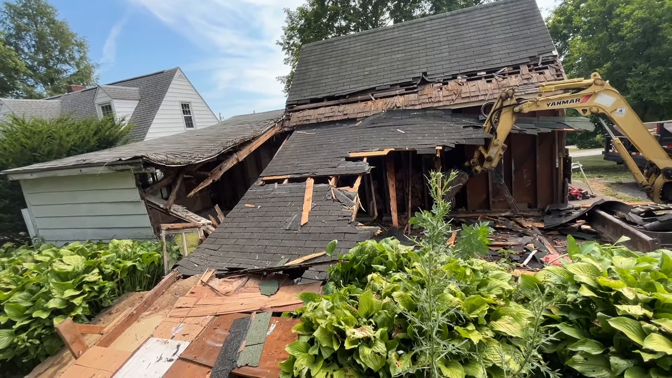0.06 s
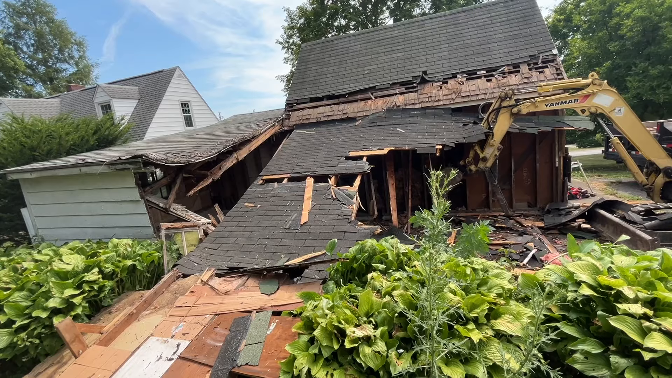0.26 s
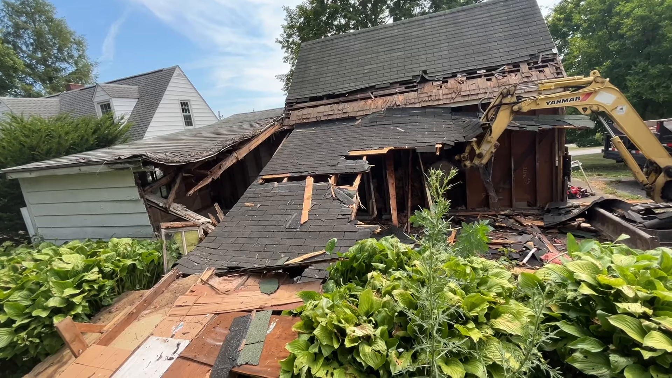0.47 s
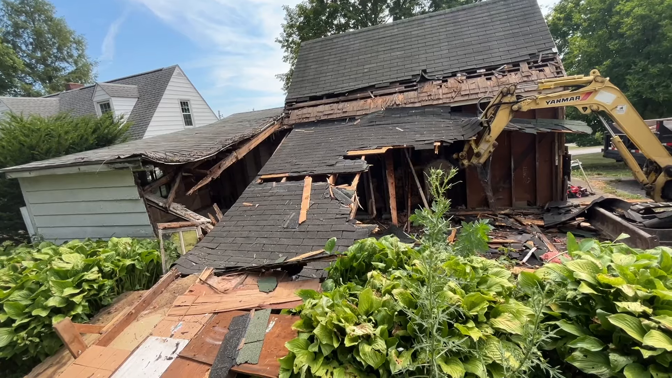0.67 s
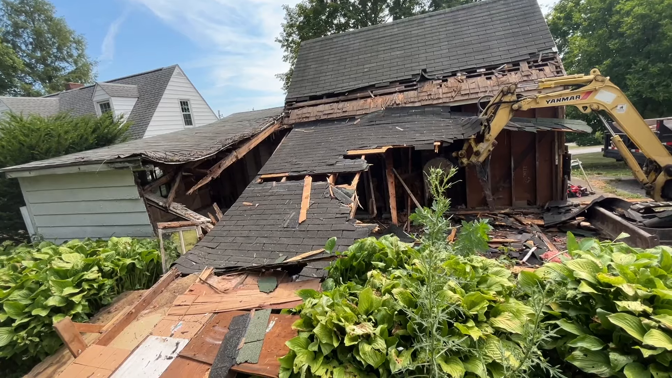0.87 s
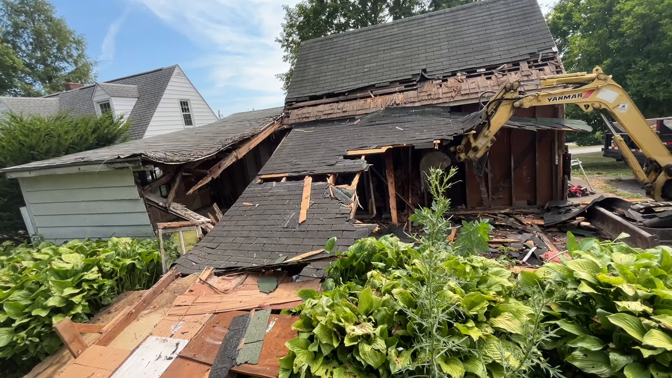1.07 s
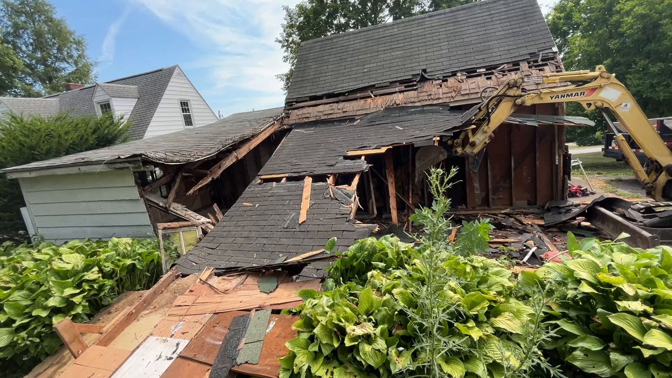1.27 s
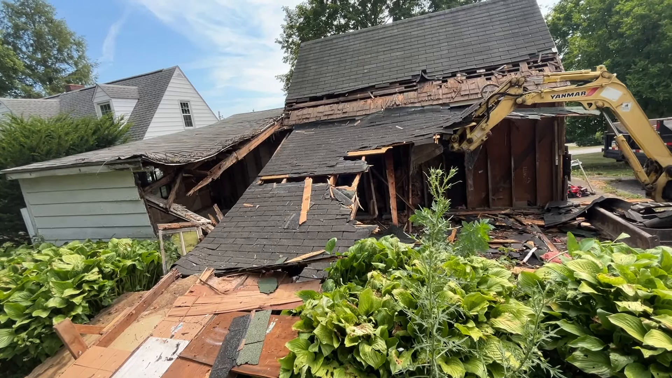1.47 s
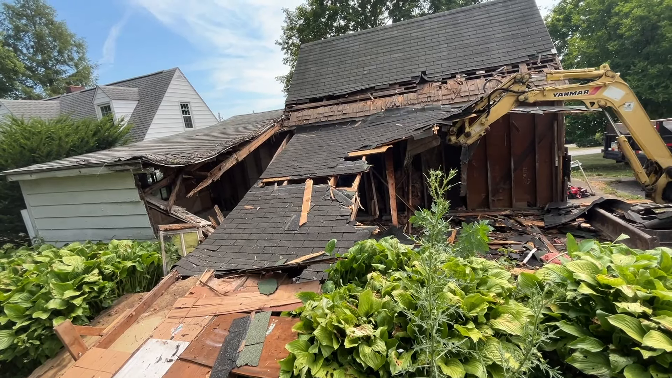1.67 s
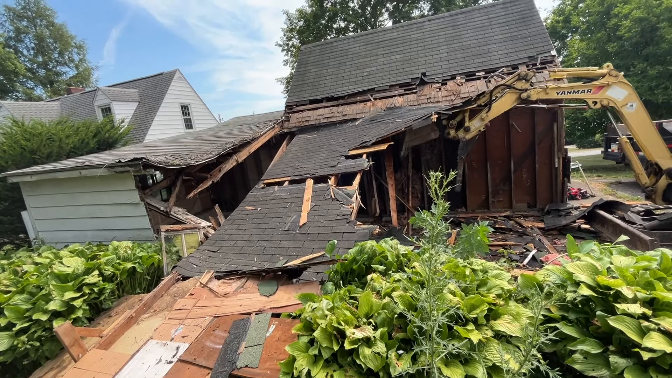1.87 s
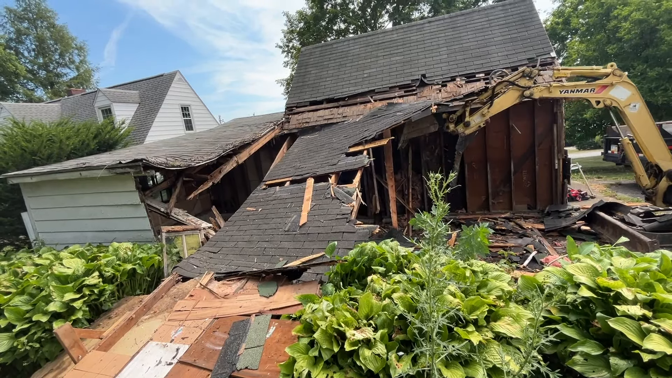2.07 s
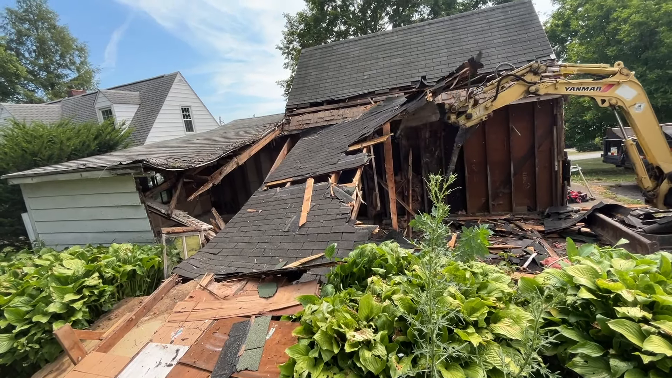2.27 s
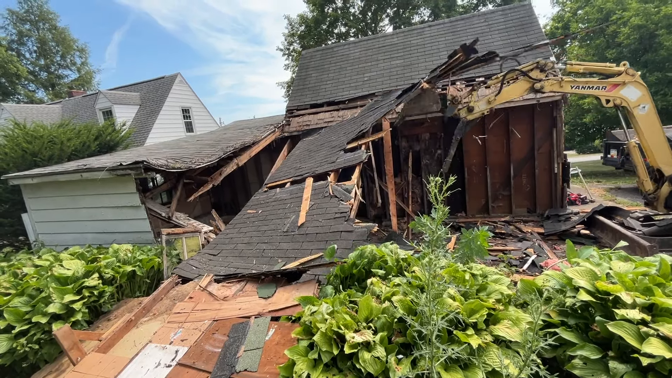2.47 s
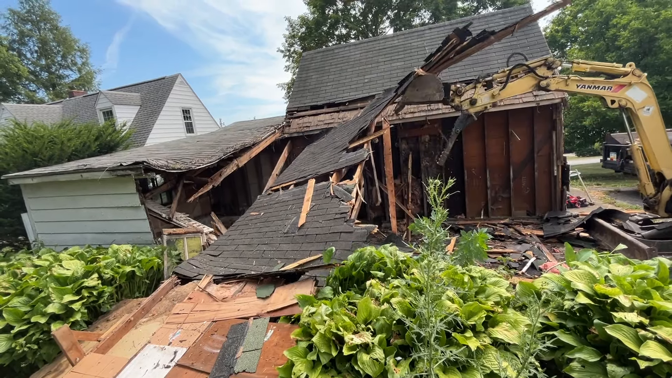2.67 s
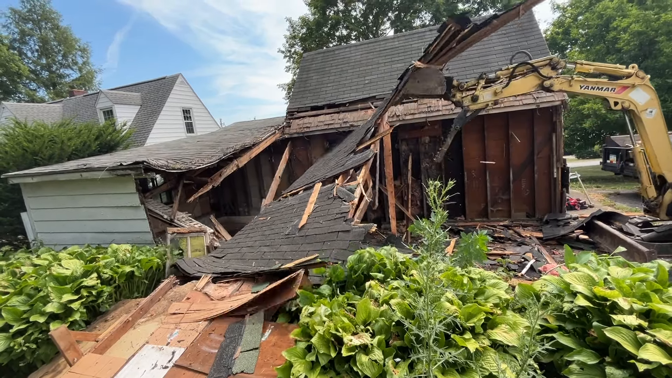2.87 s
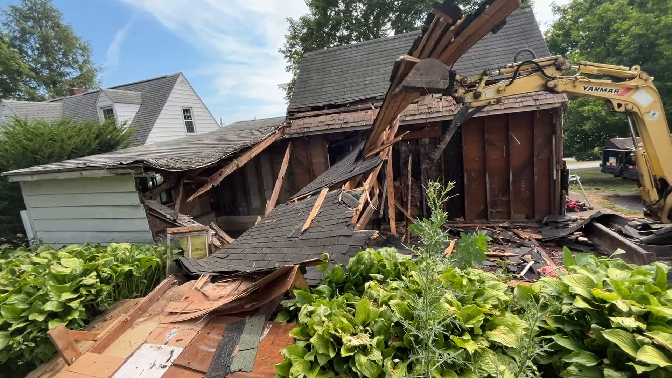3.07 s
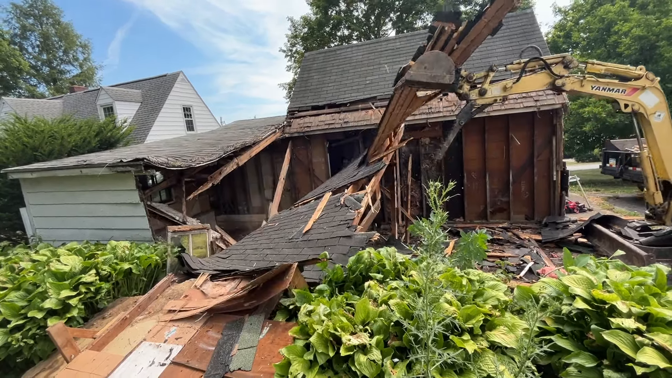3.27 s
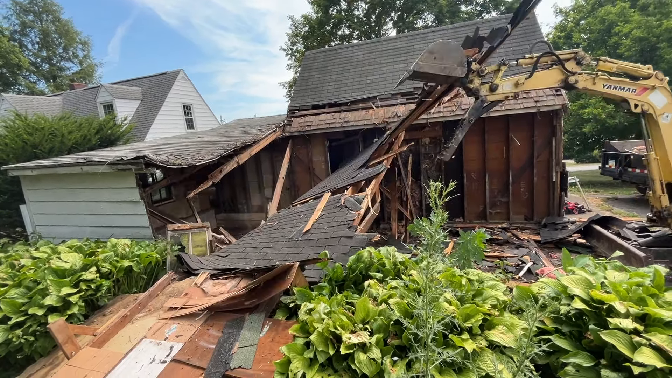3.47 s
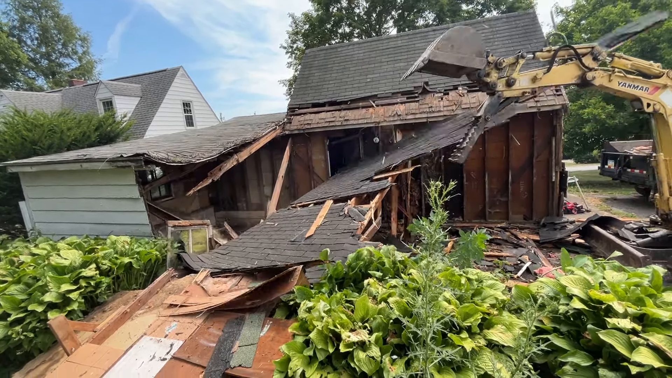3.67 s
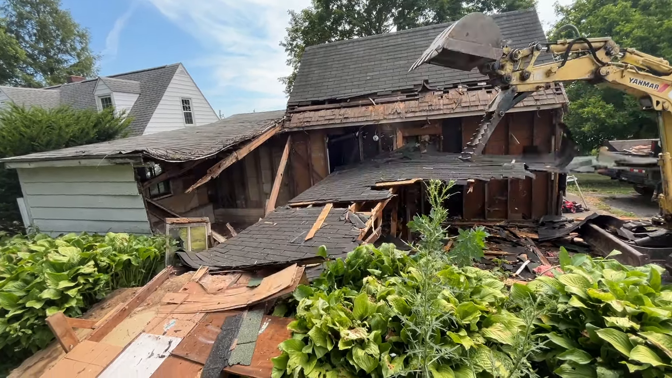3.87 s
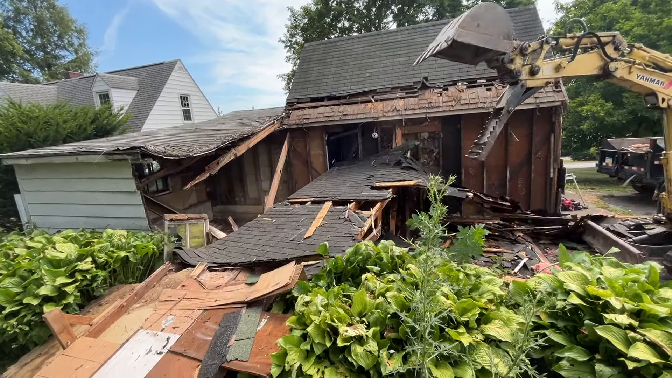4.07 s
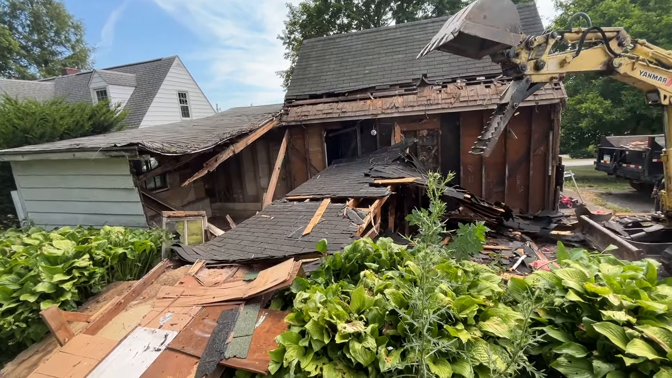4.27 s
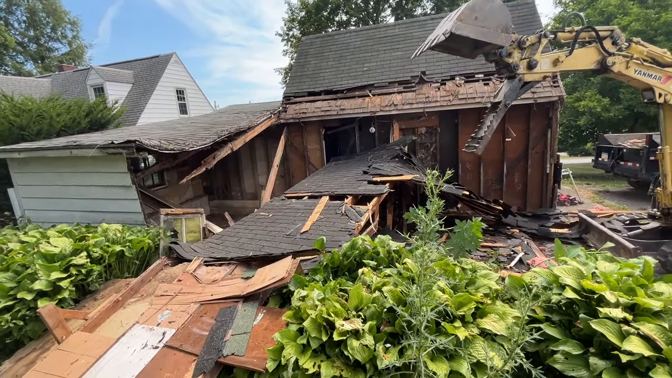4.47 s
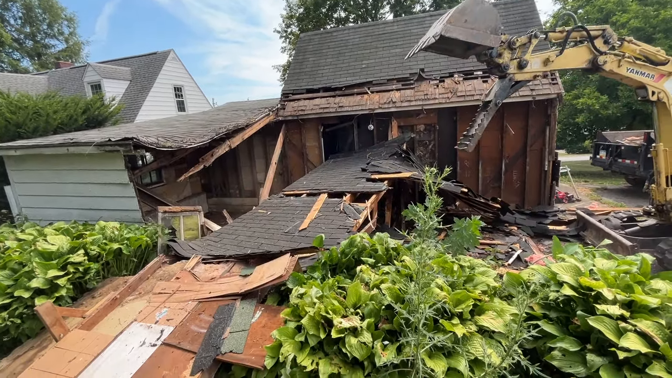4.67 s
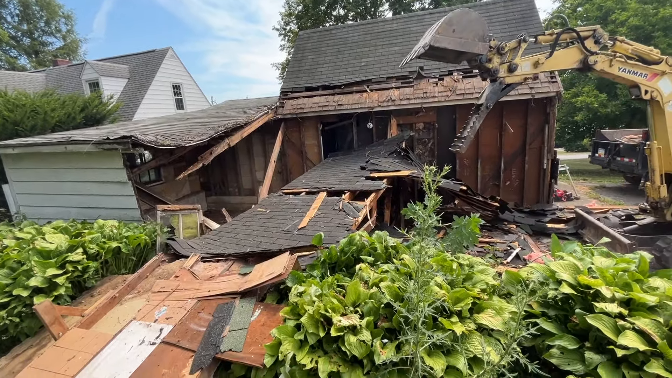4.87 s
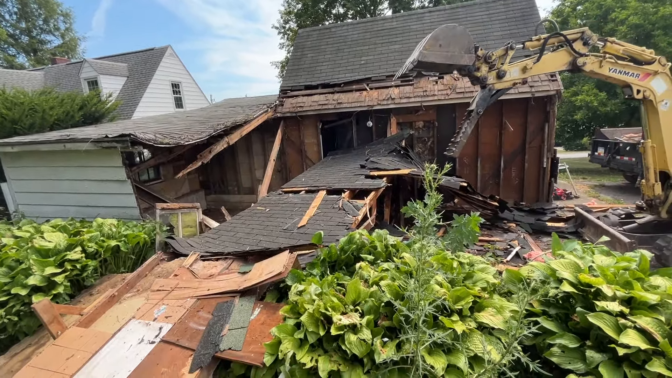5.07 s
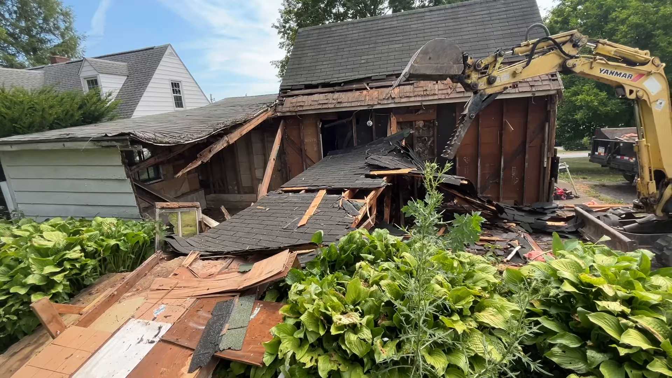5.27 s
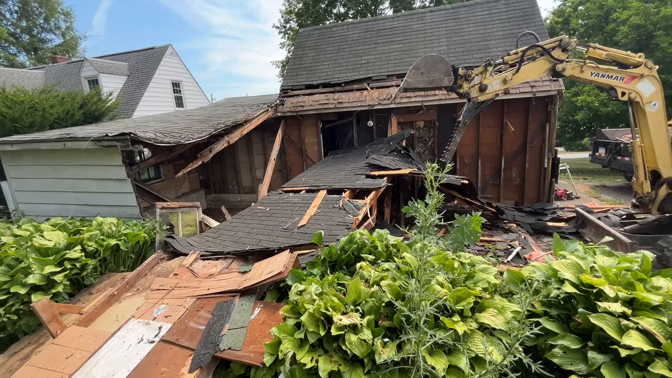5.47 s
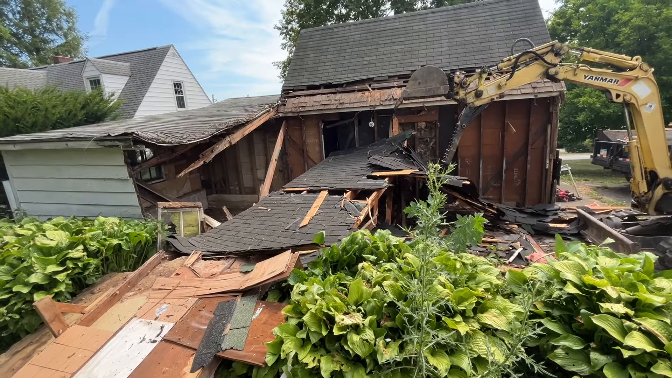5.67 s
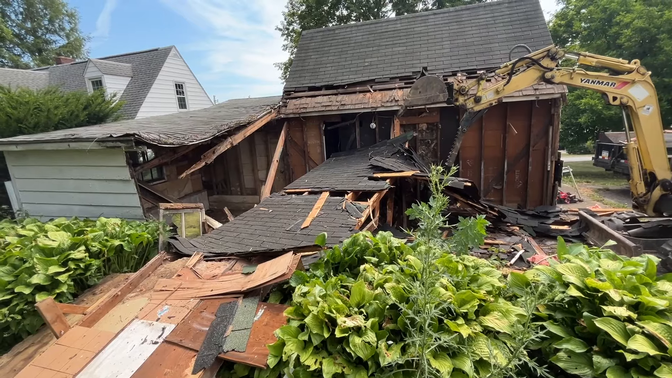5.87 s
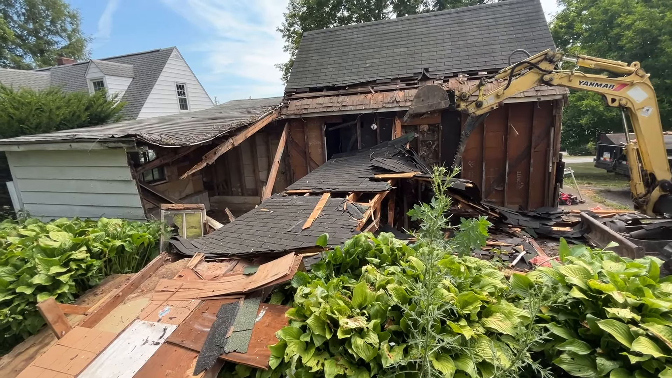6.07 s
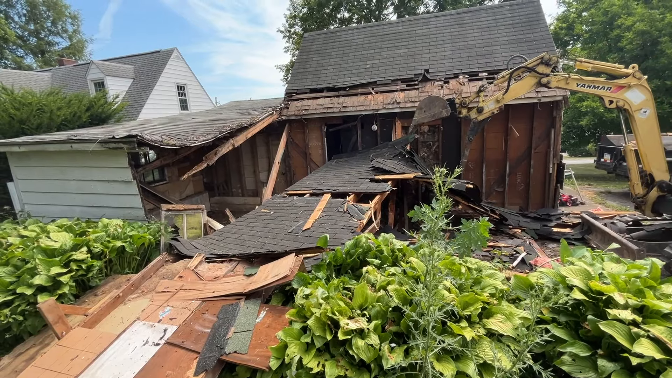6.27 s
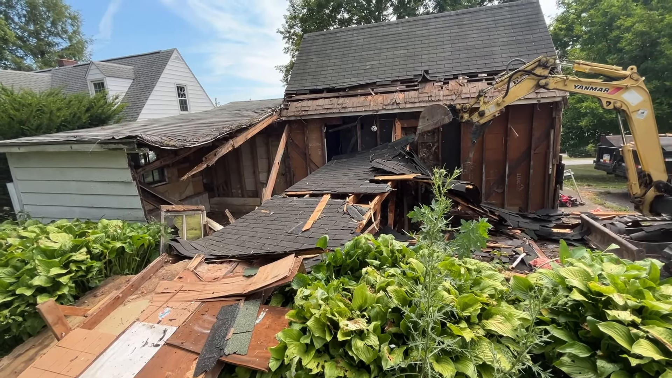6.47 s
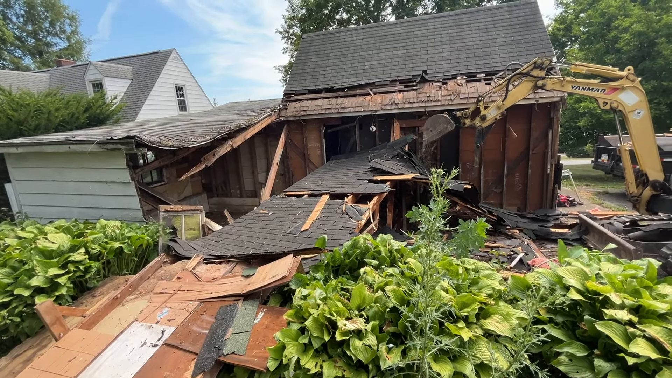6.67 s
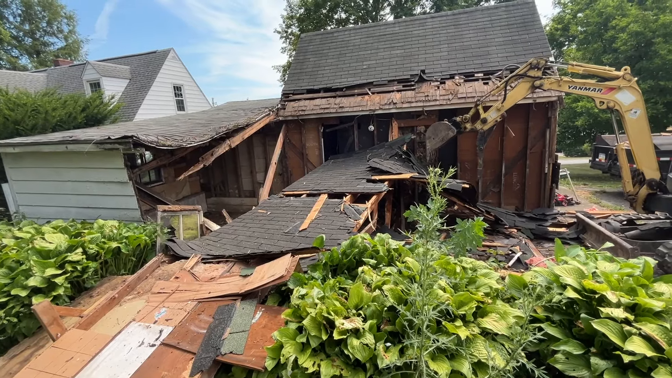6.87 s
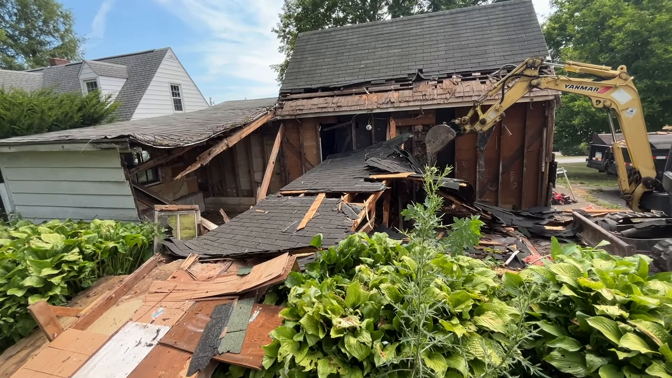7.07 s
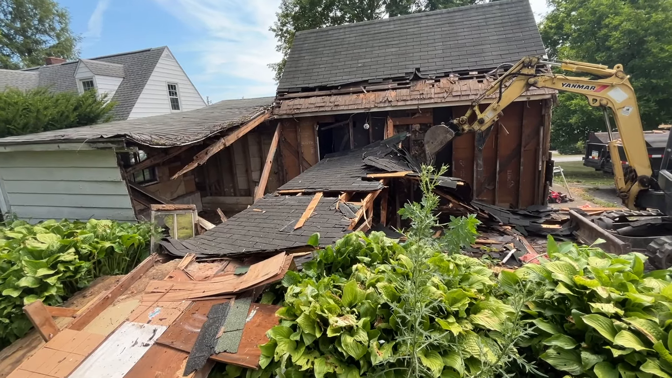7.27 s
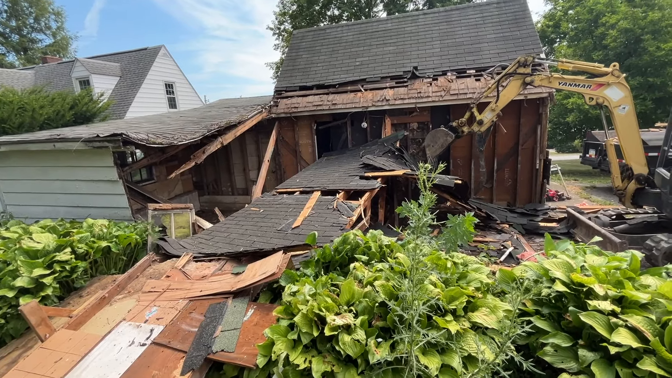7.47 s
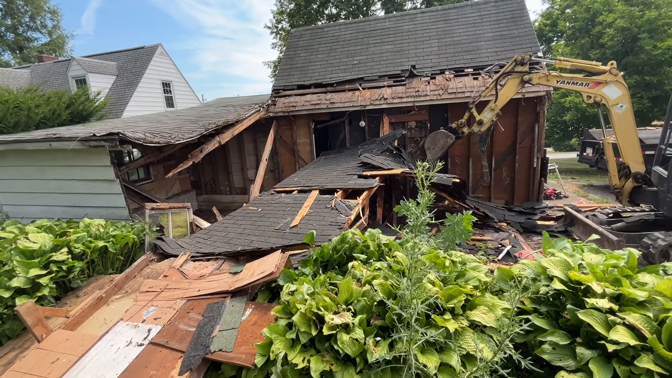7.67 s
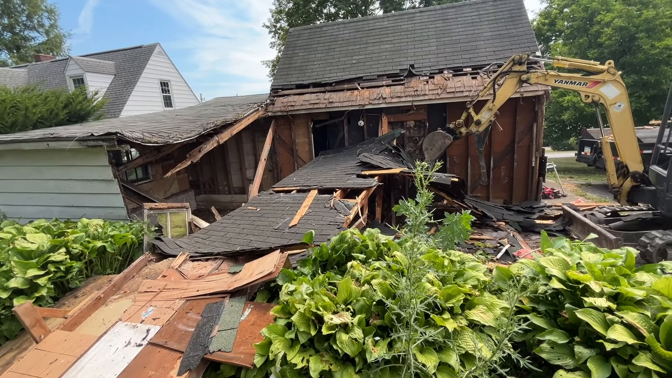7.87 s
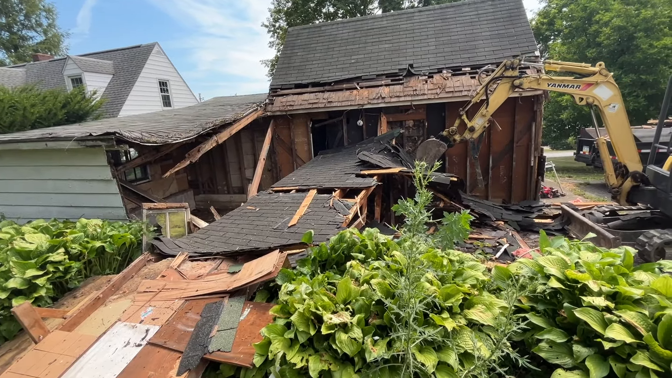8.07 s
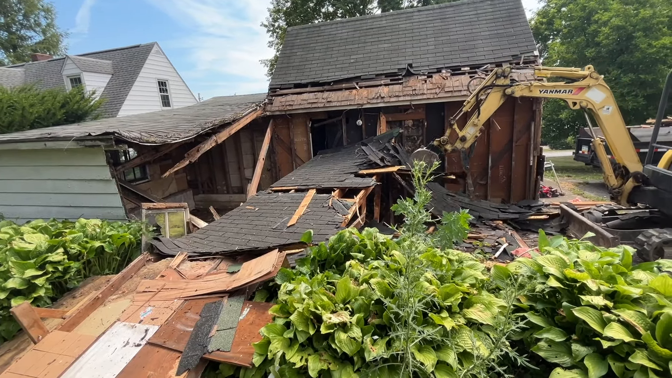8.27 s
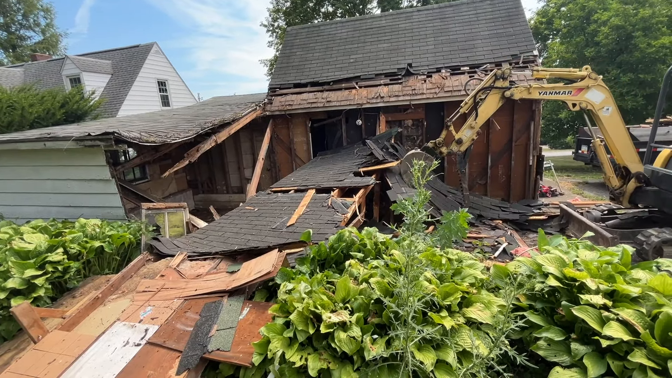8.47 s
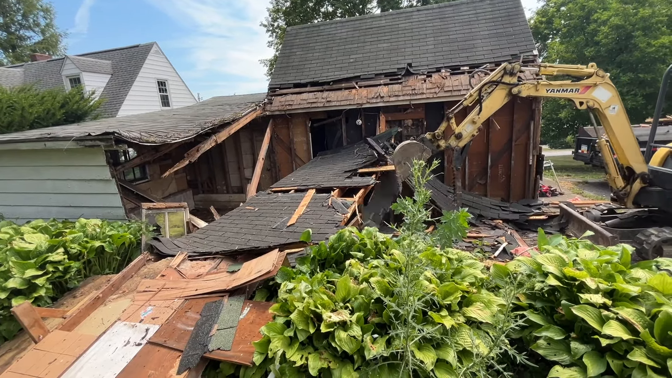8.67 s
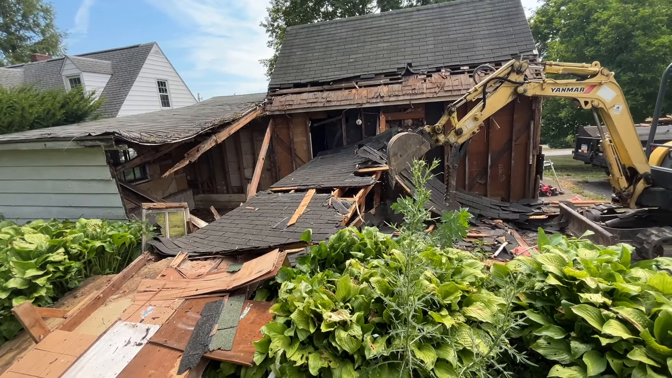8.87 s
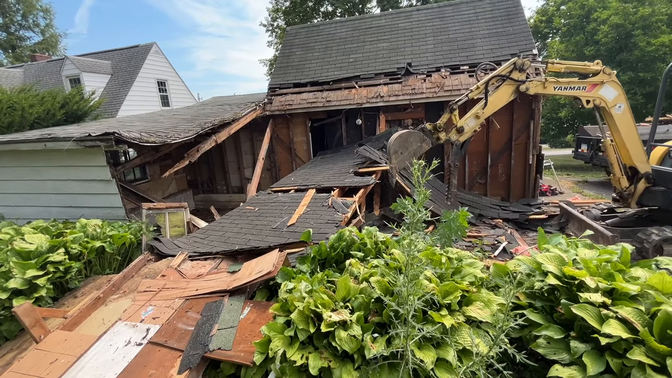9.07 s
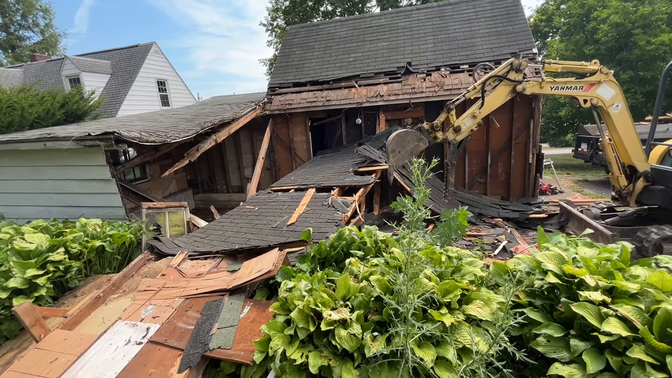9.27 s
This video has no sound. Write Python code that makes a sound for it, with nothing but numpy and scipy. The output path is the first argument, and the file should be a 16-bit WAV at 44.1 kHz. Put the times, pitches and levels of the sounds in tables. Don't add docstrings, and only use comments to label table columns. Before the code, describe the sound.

Outdoors, from several metres off in stereo, wood breaks over a continuous throbbing diesel. Boards knock and snap, grain rips, chips patter and panels land with low booms, with brief nail squeaks. After four seconds the debris settles and the engine runs freer, until soft thuds lead to a last splintery crunch. Short scattered yard echo, engine slightly to the right.

```python
import sys
import numpy as np
from scipy import signal
from scipy.fft import rfft, irfft, next_fast_len
from scipy.io import wavfile
from scipy.ndimage import uniform_filter1d, map_coordinates

SR = 44100
rng = np.random.default_rng(int(sys.argv[2]) if len(sys.argv) > 2 else 0)


def amp(db):
    return 10 ** (np.asarray(db, float) / 20)


def write(x):
    x = np.atleast_2d(x).T
    wavfile.write(sys.argv[1], SR, np.round(np.clip(x, -1, 1) * 32767).astype(np.int16))


N = 410571

# start_s, peak_db, ring_hz, t60_s
SNAPS = [(0.1738, -33.5, 6500, 0.23), (0.409, -20, 945, 0.032), (0.441, -11, 1610, 0.052),
         (0.647, -26, 1090, 0.04), (0.8288, -31, 5720, 0.049), (1.0294, -19, 1240, 0.075),
         (1.26, -41, 5030, 0.031), (1.355, -32, 5100, 0.03), (1.371, -34, 5000, 0.03),
         (1.4298, -23.5, 770, 0.051), (1.485, -29, 959, 0.079), (1.519, -27, 970, 0.073),
         (1.7536, -19, 1500, 0.036), (2.0698, -18, 734, 0.092), (2.179, -41, 1640, 0.075),
         (2.268, -12, 950, 0.11), (2.538, -25, 1070, 0.053), (3.079, -10, 1880, 0.032),
         (3.2228, -6.5, 1440, 0.031), (3.481, -24, 1690, 0.23), (3.529, -15, 1753, 0.24),
         (3.531, -5.5, 1744, 0.026), (3.8042, -16.5, 1800, 0.23), (4.6678, -35, 2530, 0.041),
         (4.8974, -28.5, 1210, 0.067), (7.855, -31, 5170, 0.069), (8.1517, -26.5, 746, 0.23),
         (8.21, -15.5, 1240, 0.11), (8.5609, -16, 2300, 0.03), (8.772, -20.5, 2023, 0.039)]
# start_s, peak_db, ring_hz, t60_s
SLAPS = [(0.286, -24, 1190, 0.16), (0.5597, -24, 1090, 0.15), (0.617, -26, 900, .094),
         (1.0046, -16.5, 1850, 0.037), (1.1866, -23, 1820, 0.074), (1.288, -18.5, 860, 0.12),
         (1.573, -4, 699, 0.016), (1.931, -11.5, 1330, 0.054), (2.0221, -12, 1330, 0.062),
         (2.092, -6.5, 800, 0.029), (2.444, -21, 970, 0.042), (2.5014, -25.5, 835, 0.12),
         (2.574, -9, 1420, 0.052), (2.6441, -5, 3270, 0.067), (2.71, -27, 937, 0.048),
         (2.9279, -11, 1800, 0.13), (3.309, -13, 1600, 0.05), (3.4255, -19, 1160, 0.15),
         (3.636, -17, 1640, 0.11), (3.7327, -5, 1125, 0.019), (4.1508, -24, 1100, 0.25),
         (6.867, -45, 1102, 0.091), (7.124, -34, 1830, 0.072), (7.2519, -42, 1520, 0.071),
         (7.5186, -43, 1895, 0.11), (8.0448, -39, 1512, 0.26), (8.2953, -8.5, 3350, .04),
         (8.6503, -12.5, 800, 0.12), (8.999, -34, 1011, .06), (9.221, -31, 596, 0.039)]
# start_s, peak_db, ring_hz, t60_s
KNOCKS = [(.442, -11, 855, 0.028), (0.549, -26.5, 394, 0.24), (0.9903, -25.5, 900, 0.17),
          (1.463, -29, 988, .022), (1.574, -6, 1410, .036), (1.577, -14.5, 300, 0.11),
          (1.774, -11.5, 4200, 0.079), (1.864, -8.5, 4110, 0.045), (1.866, -16, 1310, 0.055),
          (1.928, -7.5, 4090, 0.037), (2.022, -6.5, 3500, 0.031), (2.04, -18, 380, 0.46),
          (2.602, -16, 1700, .025), (2.623, -11, 1620, .025), (3.11, -14.5, 370, 0.18),
          (3.147, -13, 1900, 0.07), (3.3659, -22, 1038, 0.18), (3.3, -19, 394.1, 0.069),
          (3.74, -5, 1486, 0.032), (3.846, -17, 1500, 0.047), (3.9725, -19, 1093, 0.067),
          (4.343, -32, 3190, 0.071), (4.378, -33.5, 1230, 0.053), (4.447, -36, 1150, .05),
          (4.568, -41, 2040, .028), (8.601, -15.5, 1278, 0.059), (8.719, -16, 3610, .033),
          (8.796, -17.5, 410, .06), (9.0248, -24.5, 1710, 0.13), (9.221, -25, 430, 0.039),
          (9.283, -32, 960, 0.051)]
# start_s, peak_db, ring_hz, t60_s
MIXED_BREAKS = [(.197, -27, 5480, .03), (.365, -29, 805, 0.089), (0.4372, -11, 1570, 0.0092),
                (.735, -39, 796, .03), (1.303, -27, 2430, 0.11), (1.188, -40, 1820, 0.017),
                (1.289, -22, 910, 0.12), (1.405, -30, 766, 0.04), (1.561, -25, 5200, 0.11),
                (2.5735, -13, 840, 0.1), (2.658, -15, 804, 0.031), (2.7846, -24, 1660, .03),
                (2.802, -27, 995, 0.027), (2.8643, -22, 1510, .05), (2.899, -23, 1280, 0.046),
                (2.929, -15, 970, 0.027), (2.9533, -19, 1610, 0.042), (2.977, -21, 960, 0.081),
                (3.017, -11, 3200, 0.049), (3.1, -13, 870, 0.11), (3.153, -6.5, 1660, 0.019),
                (3.168, -15.5, 1700, 0.044), (3.248, -13, 1050, 0.11), (3.5392, -5, 6780, 0.05),
                (3.57, -14, 1900, 0.087), (4.028, -11, 3500, 0.077), (4.052, -8.5, 1290, 0.026),
                (4.101, -11, 3540, 0.073), (4.1494, -20, 1218, 0.063), (4.876, -50, 958.2, 0.027),
                (6.806, -28, 330, 0.031), (6.884, -27.5, 274, 0.047), (7.265, -25.5, 400, .06),
                (7.281, -31, 888.5, 0.096), (7.41, -40, 1655, 0.11), (7.854, -32, 1970, 0.069),
                (8.2133, -14, 5520, 0.067), (8.272, -29, 7100, 0.016), (8.2875, -9, 6460, 0.047),
                (8.2957, -12, 2560, 0.019), (8.447, -24, 9100, 0.016), (8.456, -11, 7860, 0.047),
                (8.464, -12, 5470, 0.038), (8.481, -11, 6480, 0.018), (8.4886, -18, 9200, 0.013),
                (8.666, -10.5, 2200, 0.051), (8.896, -20, 2810, 0.12), (9.179, -35, 1420, 0.055),
                (9.245, -29, 3170, 0.051)]
# start_s, peak_db, ring_hz, t60_s
RIPS = [(2.791, -13, 1097, 0.049), (2.854, -10, 1699, .11), (2.8, -7, 1343, .11),
        (3.425, -19.5, 2180, 0.18), (3.495, -16, 1510, 0.16), (3.639, -18, 1880, 0.13),
        (4.005, -11, 1440, .2), (4.039, -5, 1310, 0.092), (8.826, -15, 1389, 0.12),
        (9.18, -35.5, 1315, 0.15)]
# bright_snap_db, broad_part_db, ring_sharpness_q, blow_over_raggedness, rise_over_t60
BREAK_KINDS = [
    (4.5, 2.5, 2.4, 1.2, 0.025),
    (-37, -1, 2.4, 0.66, 0.046),
    (-81, -8.5, 4.5, 0.84, 0.04),
    (-33, -11.5, 2.7, 0.99, 0.029),
    (-14, -4.5, 1.6, 0, 0.13),
]
# start_s, length_s, start_level_db, end_level_db
SLIDES = [(0, 3.4, -50.5, -28.5), (0.406, 0.24, -29.5, -42), (1.743, 0.28, -26.5, -39),
          (2.025, 0.27, -19.5, -21), (2.295, 0.13, -46, -32.5), (2.58, 0.075, -16, -26.5),
          (2.794, 0.033, -11, -29), (2.858, 0.15, -13, -13), (3.08, 0.25, -18, -31.5),
          (3.443, 0.076, -18.5, -60), (3.604, 0.31, -25, -22.5), (3.965, 0.22, -18, -27),
          (4.197, 1.156, -56, -51.5), (6.845, 0.052, -45.5, -44), (7.49, 0.042, -47, -41.5),
          (7.832, 0.055, -38, -45.5), (8.047, 0.18, -35, -19), (8.27, 0.037, -20.5, -18.5),
          (8.416, 0.043, -20, -16), (8.482, 0.485, -31, -31), (8.95, 0.334, -45.5, -43.5)]
# pitch_hz, level_db (per Hz)
SPLINTER_TONE = [(290, -4), (500, -9), (970, 2), (1640, 0.5), (2900, -1.5), (4700, -5.5), (7300, -1.5),
                 (10000, -15), (13000, -17), (16000, -20)]
# pitch_hz, level_db (per Hz)
BOARD_TONE = [(71, 9.5), (120, 13.5), (204, 7), (304, 15), (624, -7.5), (857, 7), (1500, 1.5), (1950, 4),
              (3300, -120)]
# start_s, peak_db, pitch_hz, t60_s
THUDS = [(0.054, -23.5, 111.7, 0.29), (0.437, -14, 94.5, 0.12), (0.501, -9, 96, 0.092),
         (1.019, -10, 82, 0.18), (1.57, -13, 129.4, 0.14), (1.608, -8.5, 95, 0.12), (2.076, -18, 106, 0.16),
         (3.198, -15, 87.7, 0.16), (3.682, -7, 132.4, 0.091), (3.741, -2, 76.5, 0.076),
         (3.797, -22, 83, 0.2), (6.815, -6.5, 65.5, 0.15), (6.881, -20.5, 84, 0.28),
         (6.961, -32, 116, 0.54), (7.277, -21, 123, 0.18), (7.346, -11.5, 88, 0.12),
         (7.392, -15, 83.56, 0.11), (8.231, -15, 93.7, 0.16), (8.418, -15, 92.1, 0.12),
         (8.658, -14.5, 157, 0.12)]
# start_s, length_s, slip_hz, level_db, octave_db
SQUEALS = [(2.193, 0.044, 2570, -19, -31), (2.217, 0.054, 1740, -19, -19), (8.424, 0.045, 863, -15, 6.5),
           (8.442, 0.062, 411, -27, -9), (3.866, 0.075, 2520, -25, -32), (5.821, 0.18, 139, -37, -14),
           (7.249, 0.03, 1925, -42, -25), (7.52, 0.038, 1890, -48, -10), (7.285, 0.04, 403, -28, -21),
           (6.89, 0.035, 1105, -43, -30), (1.055, 0.03, 1960, -39, -30), (8.826, 0.15, 412, -30, -9)]
# time_s, firing_hz, exhaust_boom_db
ENGINE = [(0, 49.18, -36.5), (.55, 48.4, -37.5), (1.0, 48.15, -36), (1.45, 47.74, -37), (1.9, 45.93, -35.5),
          (2.5, 47.5, -37.5), (3.0, 47.9, -40), (3.6, 50.1, -38.5), (4.3, 50.09, -38.5), (4.8, 51.13, -36),
          (6.3, 51.06, -38.5), (6.9, 49.54, -38), (7.75, 49.78, -38.5), (8.1, 49.3, -37), (8.3, 46.9, -41),
          (8.65, 48.76, -39.5), (9.31, 49.28, -34.5)]
# multiple_of_cycle (four-stroke), level_db
EASY_ORDERS = [(1, -40), (2, -32), (3, -6), (4, -32), (5, -11.5), (6, -2.5), (7, -34), (8, -32), (9, -7),
               (10, -10), (11, -19), (12, -7), (13, -5), (14, -31), (15, -9), (16, -15), (17, -22),
               (18, -17.5), (19, -31), (20, -14.5)]
# multiple_of_cycle, level_db
LOADED_ORDERS = [(1, -51), (2, -42), (3, -10), (4, -46), (5, -2), (6, 9), (7, -22), (8, -33), (9, 1),
                 (10, -17), (11, -15), (12, -1.5), (13, -9.5), (14, -53), (15, -8.5), (16, -15), (17, -8),
                 (18, -8), (19, -42), (20, -11.5)]
# multiple_of_cycle, level_db
PUMP = [(24, -58), (27, -59), (34, -68), (35, -67), (36, -58.5), (48, -62)]
# pitch_hz, level_db (per Hz)
KNOCK_TONE = [(300, -12.5), (420, -2.5), (510, -10.5), (590, -1), (700, -10), (880, -1), (1150, -4),
              (1400, -14.5), (2500, -16)]
# pitch_hz, level_db (per Hz)
CASING_TONE = [(25, -56), (60, -9), (130, -8), (250, -21), (500, -17.5), (900, -15), (1200, -35),
               (1450, -25.5), (2100, -29.5), (2900, -25.5), (4500, -29.5), (8000, -31), (13000, -40.5),
               (16000, -41)]
# low_hz, high_hz
CLATTER_BAND = [2400, 3200]
# pitch_hz, t60_s
YARD = [(200, 0.54), (2000, 0.089), (10000, 0.28)]
# pitch_hz, share (0 to 1)
TREBLE_SHARE = [(6000, 0), (7300, .3), (9500, .55), (12000, .9)]
# pitch_hz, lag_radians
PORT_LAG = [(0, 0), (2200, .9), (4200, 1.6), (5600, 2.8), (7600, 3.3), (9700, 6.3), (12200, 9.4),
            (14700, 12.4), (17000, 13.4)]
# pitch_hz, difference_db
PORT_LEAN = [(50, 1), (180, -.4), (350, -1), (700, -2.5), (1400, 1), (2800, .8), (5600, -.6)]


def unit(x):
    return x / np.sqrt(np.mean(x ** 2) + 1e-20)


def along(points, hz):
    f, v = np.transpose(points)
    return np.interp(np.log(hz + 1), np.log(f + 1), v)


def curves(rows):
    s, *cols = np.transpose(rows)
    return [np.interp(np.arange(N) / SR, s, c) for c in cols]


def wobble(rate, size=N):
    knots = rng.standard_normal(int(size * rate / SR) + 4)
    return map_coordinates(knots, [np.arange(size) * rate / SR])


def band(x, order, edges_hz):
    return signal.lfilter(*signal.butter(order, edges_hz, "band", fs=SR), x)


def treble(x, corner_hz):
    return signal.lfilter(*signal.butter(2, corner_hz, "high", fs=SR), x)


def coloured(x, spectrum):
    m = next_fast_len(N + 8192)
    gain = amp(along(spectrum, np.fft.rfftfreq(m, 1 / SR)))
    return unit(irfft(rfft(x, m) * gain, m)[..., :N])


def patchy(depth_db, bins, frames):
    z = signal.stft(rng.standard_normal(N), nperseg=256)[2]
    field = uniform_filter1d(rng.standard_normal(z.shape), bins, 0)
    field = uniform_filter1d(field, frames, 1)
    return unit(signal.istft(z * amp(depth_db * unit(field)), nperseg=256)[1][:N])


def add(track, s, sound):
    part = track[..., round(s * SR):][..., :sound.shape[-1]]
    part += sound[..., :part.shape[-1]]


def spread_out(x, other, corner_hz, share):
    apart = share * treble(other, corner_hz)
    return np.array([x + apart, x - apart])


def cracks():
    track, t = np.zeros((2, N)), np.arange(SR // 5) / SR
    tables = (SNAPS, SLAPS, KNOCKS, MIXED_BREAKS, RIPS)
    breaks = [row + kind for rows, kind in zip(tables, BREAK_KINDS) for row in rows]
    for s, db, hz, t60, snap_db, wide_db, sharp, blow, rise in breaks:
        t60 = np.clip(t60, .015, .2)
        fade = amp(-60 * t / t60)
        a, b = rng.standard_normal((2, 2, len(t))) * (1 - np.exp(-t / (rise * t60)))
        pulse = np.cos(2 * np.pi * hz * t) * np.exp(-((t - .0025) / .0015) ** 2)
        struck = a + blow * min(1, .04 / t60) * pulse
        ring = signal.lfilter(*signal.iirpeak(hz, sharp, SR), struck * fade)
        ring = ring + amp(-9) * signal.lfilter(*signal.iirpeak(1.47 * hz, sharp, SR), b * fade)
        wide = band(a * amp(-60 * t / (.75 * t60)), 1, [500, 6000])
        snap = band(b * amp(-60 * t / (.7 * t60)), 2, [4500, 12000])
        body = ring / np.abs(ring).max() + amp(wide_db) * wide / np.abs(wide).max()
        bright = amp(snap_db - 7.0) * snap / np.abs(snap).max()
        add(track, s - .0015, amp(db) * (amp(0.5) * body + bright))
    return spread_out(*track, 2600, share=.7)


def slides():
    set_in_db_per_s, settle_db_per_s = 1500, 178
    t, power = np.arange(N) / SR, 1e-10
    for s, length, start_db, end_db in SLIDES:
        u = t - s
        running_db = start_db + (end_db - start_db) * np.clip(u / length, 0, 1)
        before_db = set_in_db_per_s * np.minimum(u, 0)
        after_db = settle_db_per_s * np.maximum(u - length, 0)
        power = power + amp(running_db + before_db - after_db) ** 2
    return 10 * np.log10(power)


def debris():
    splinter_db = slides()
    board_db = splinter_db - 1.5 - (1 - 0.2) * np.maximum(splinter_db + 34, 0)
    hits = rng.random(N) < 500 / SR * amp(4 * wobble(25))
    clicks = hits * amp(np.minimum(4.5 * rng.exponential(size=N), 10))
    t = np.arange(400) / SR
    click_fade = amp(-120 * t / .016)
    bursts = np.sqrt(np.abs(signal.fftconvolve(clicks ** 2, click_fade)[:N]))
    patches = np.array([patchy(3.5, bins=4, frames=6) for _ in range(2)])
    splinters = coloured(patches * (.45 + unit(bursts)), SPLINTER_TONE)
    boards = coloured(patchy(2.5, bins=1, frames=8) * amp(2.5 * wobble(40)), BOARD_TONE)
    return amp(splinter_db - 2.5) * spread_out(*splinters, 2500, share=.55) + amp(board_db) * boards


def thuds():
    track, t = np.zeros(N), np.arange(SR // 3) / SR
    for s, db, hz, t60 in THUDS:
        boom = np.sin(2 * np.pi * hz * t) + 0.51 * np.sin(2 * np.pi * 1.6 * hz * t)
        puff = unit(band(rng.standard_normal(len(t)), 2, [170, 480])) * amp(-60 * t / 0.093)
        rise = 1 - np.exp(-t / 0.025)
        level = amp(db + 3.0 - 60 * t / np.clip(t60, .03, .5))
        add(track, s - .004, level * rise * (boom + 0.35 * puff))
    return track


def squeals():
    track = np.zeros(N)
    for s, length, hz, db, octave_db in SQUEALS:
        u = np.linspace(0, 1, round(2.0 * length * SR))
        size = len(u)
        failing = np.clip((db + 40) / 24, .1, 1) * np.clip(2.5 * u, 0, 1) ** 2
        pitch_hz = hz * (1 + (.012 + .09 * failing) * wobble(300, size))
        turn = 2 * np.pi * np.cumsum(pitch_hz) / SR
        overtones = sum(g * np.sin(k * turn) for k, g in [(2, 1), (3, 0.38), (4, 0.29), (5, 0.075)])
        tone = np.sin(turn) + amp(octave_db) * overtones
        scratch = band(rng.standard_normal(size), 1, [hz, 6 * hz]) * (1 + np.sin(turn))
        shake_db = (1.5 + 2 * failing) * wobble(200, size)
        shape = (1 - np.exp(-u / 0.024)) * (1 - u) ** 1.09
        add(track, s, amp(db + shake_db) * shape * (tone + 0.19 * failing * unit(scratch)))
    return track


def engine():
    firing_hz, boom_db = curves(ENGINE)
    turns = np.cumsum(firing_hz * (1 + .001 * wobble(12))) / SR / 3
    cycle = 2 * np.pi * turns
    load = np.clip((50.6 - firing_hz) / 2.49, 0, 1)

    lines = np.zeros(N)
    for (k, easy_db), (_, loaded_db) in zip(EASY_ORDERS, LOADED_ORDERS):
        level = amp(easy_db + load * (loaded_db - easy_db) + .9 * wobble(9))
        lines += level * np.sin(k * cycle + 2 * np.pi * rng.random())
    for k, db in PUMP:
        lines += amp(db - boom_db + 12.9 * load + 1.6 * wobble(2.27)) * np.sin(k * cycle)

    pattern = map_coordinates(rng.standard_normal(400), [turns % 1 * 400], mode="grid-wrap")
    knock = coloured(pattern * amp(0.58 * wobble(4.1)), KNOCK_TONE) * amp(-50.5 + 4.8 * load)

    uneven = .12 * np.cos(cycle + 1.1) + .08 * np.cos(2 * cycle)
    beat = np.exp(.18 * np.cos(3 * cycle) + uneven + .06 * np.cos(6 * cycle))
    noise = np.array([patchy(1.7, bins=3, frames=20) for _ in range(2)])
    near, spread = coloured(noise * beat, CASING_TONE) * amp(-50.0 + 7.6 * load)
    spread = band(spread, 3, [450, 4300])

    valve_turn = cycle + 0.77
    valves = np.exp(1.1 * np.cos(3 * valve_turn) + .7 * np.cos(valve_turn + np.pi / 3))
    repeated = map_coordinates(rng.standard_normal(1200), [turns % 1 * 1200], mode="grid-wrap")
    taps = .6 * rng.standard_normal(N) + repeated
    clatter = amp(-55 + 3 * load) * unit(band(taps * valves, 2, CLATTER_BAND))

    middle = amp(boom_db - 0.5) * lines + clatter + knock + near
    return middle + 1.71 * np.array([spread, -spread])


def yard(x):
    hz, t, z = signal.stft(rng.standard_normal((2, SR // 2)), SR, nperseg=256)
    fade = amp(-60 * t / along(YARD, hz)[:, None])
    tail = signal.istft(z * fade, SR, nperseg=256)[1]
    late = np.pad(x, (300, 0))[None]
    return signal.fftconvolve(late, tail / np.linalg.norm(tail[0]), axes=1)[:, :N]


def scene():
    breaks, slips = cracks() + debris(), squeals()
    scattered = treble(breaks.mean(axis=0) + 1.4 * slips, 350)
    low = (thuds() + engine()) * amp([[-.8], [.8]])
    return breaks + slips + amp(-6.5) * yard(scattered) + low


def weaker_dropped(x, margin_db, attack_db, treble_hz=6300):
    hz, _, z = signal.stft([x[0] + x[1], x[0] - x[1]], SR, nperseg=1024)
    power = uniform_filter1d(uniform_filter1d(np.abs(z) ** 2, 12, 1), 3, 2)
    treble_power = (np.abs(z[:, hz > treble_hz]) ** 2).sum(axis=(0, 1))
    attack = treble_power > np.roll(treble_power, 2) * amp(2 * attack_db)
    strong = np.abs(power) > np.abs(power[::-1]) * amp(2 * margin_db)
    keep = strong | (hz < treble_hz)[:, None] | attack
    both, apart = signal.istft(z * keep, SR, nperseg=1024)[1][:, :N]
    return np.array([both + apart, both - apart]) / 2


def top_cut(x):
    return signal.sosfilt(signal.butter(12, 16980, fs=SR, output="sos"), x)


def record(dry):
    hz = np.fft.rfftfreq(N, 1 / SR)
    left, right = rfft(dry / (1 + np.abs(dry / .8) ** 4) ** (1 / 4))
    right = right + along(TREBLE_SHARE, hz) * (left - right)
    right = right * np.exp(-1j * np.interp(hz, *np.transpose(PORT_LAG)))
    lean = amp(along(PORT_LEAN, hz) / 2)
    reach = (hz < 15800) / np.sqrt(1 + (42 / (hz + 1)) ** 6)
    heard = irfft(np.array([left * lean, right / lean]) * reach, N)
    return top_cut(weaker_dropped(heard, margin_db=-6.0, attack_db=5))


dry = scene()
out = record(dry)
write(out)
```